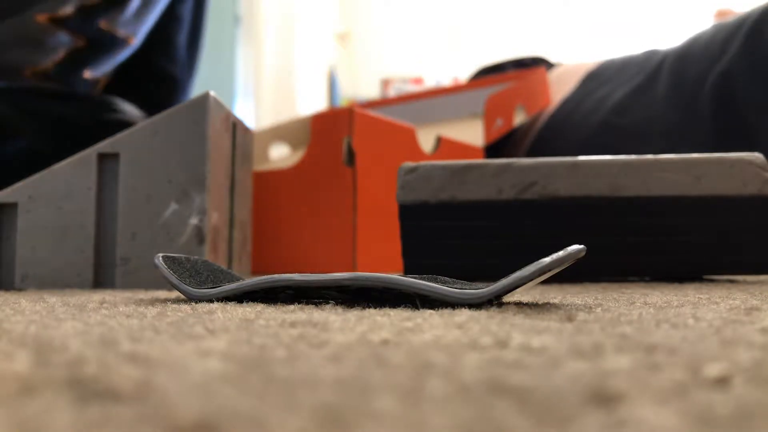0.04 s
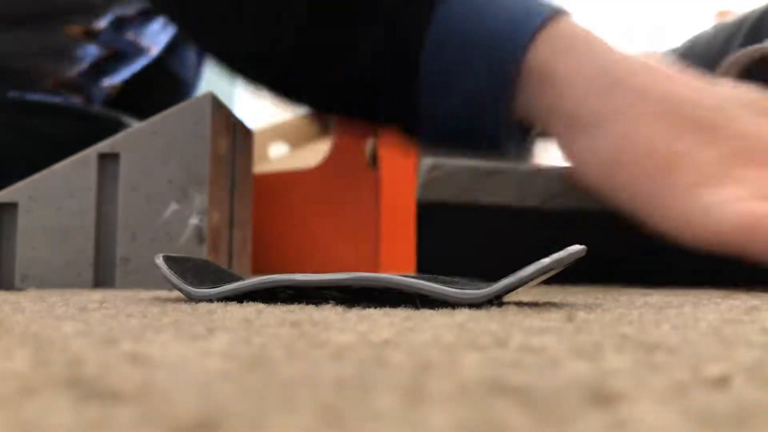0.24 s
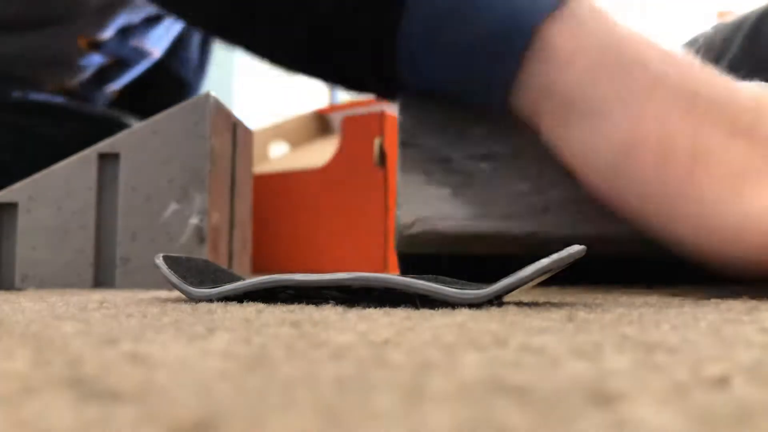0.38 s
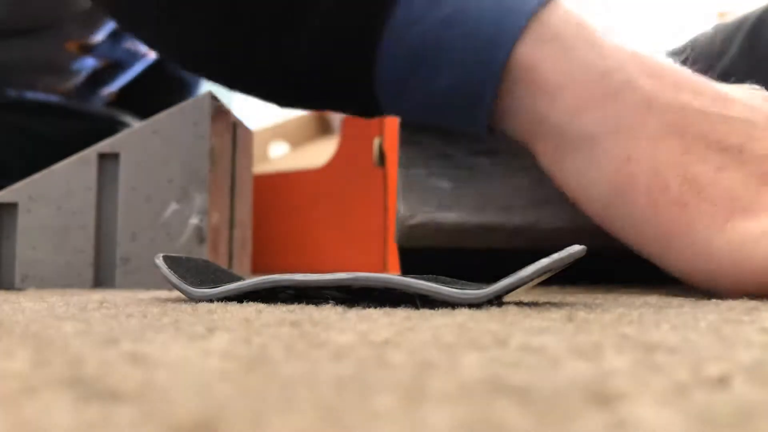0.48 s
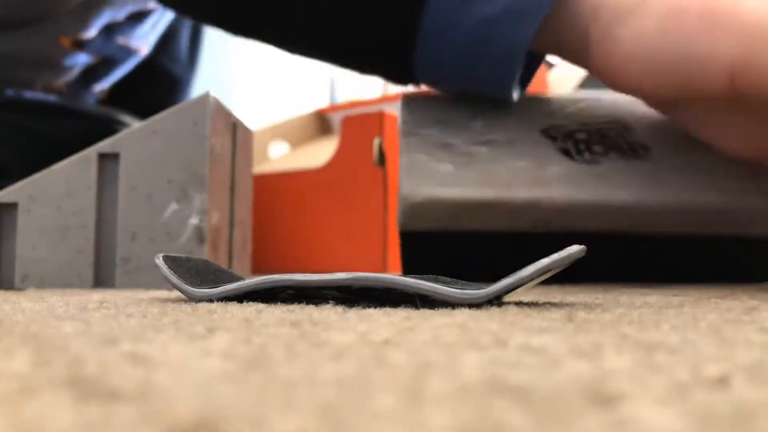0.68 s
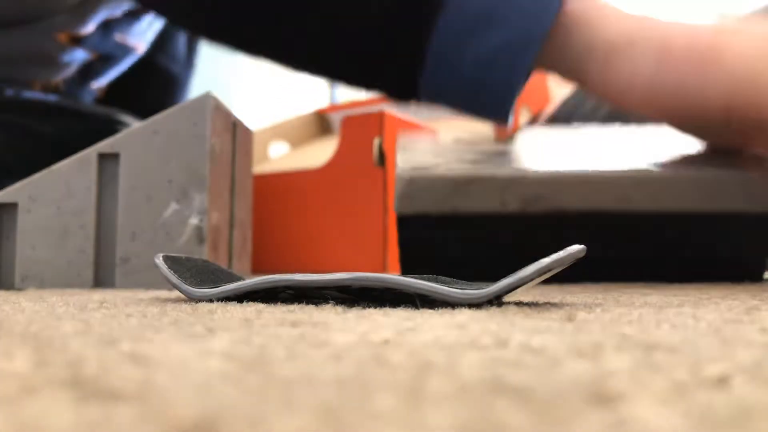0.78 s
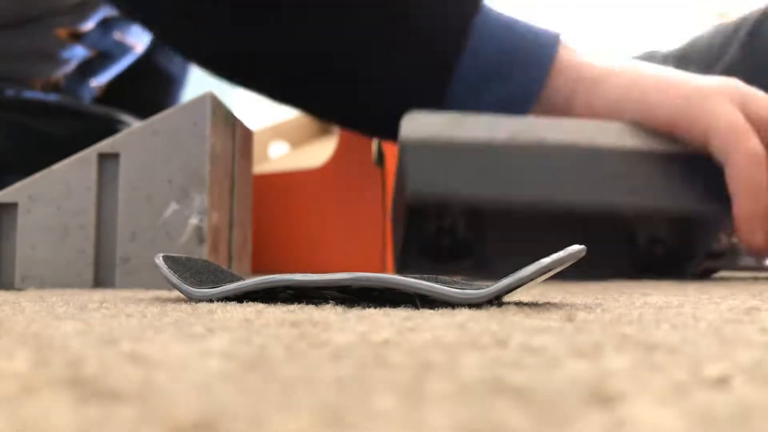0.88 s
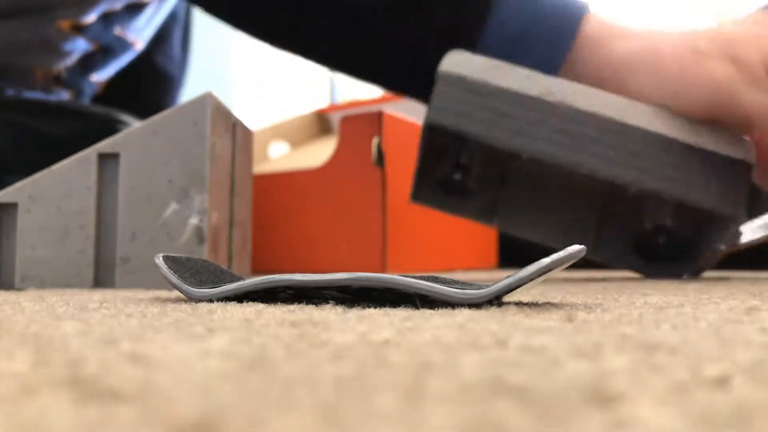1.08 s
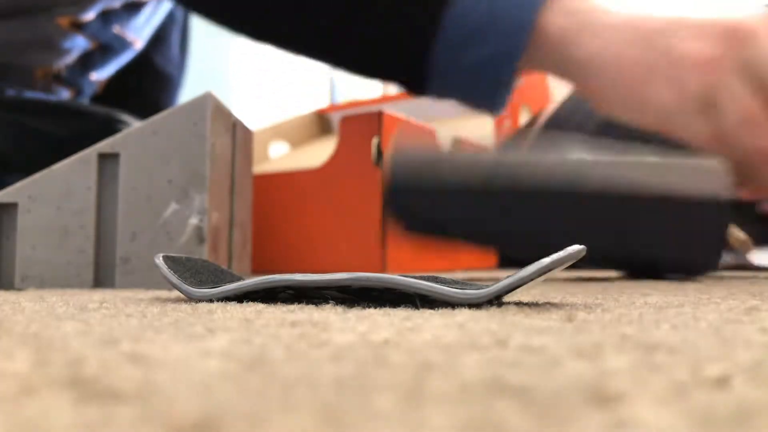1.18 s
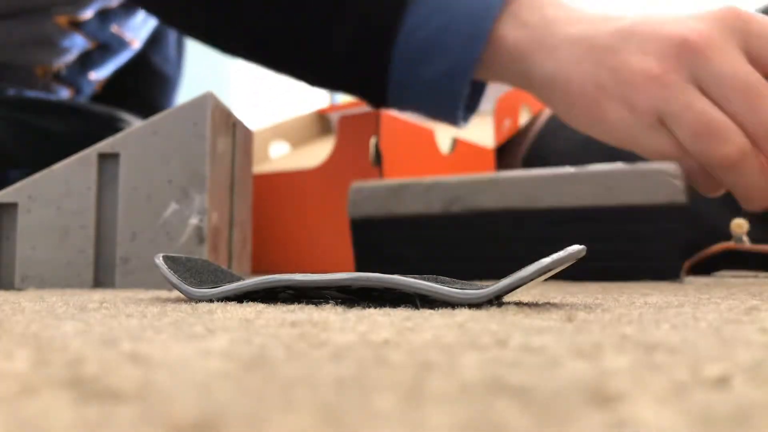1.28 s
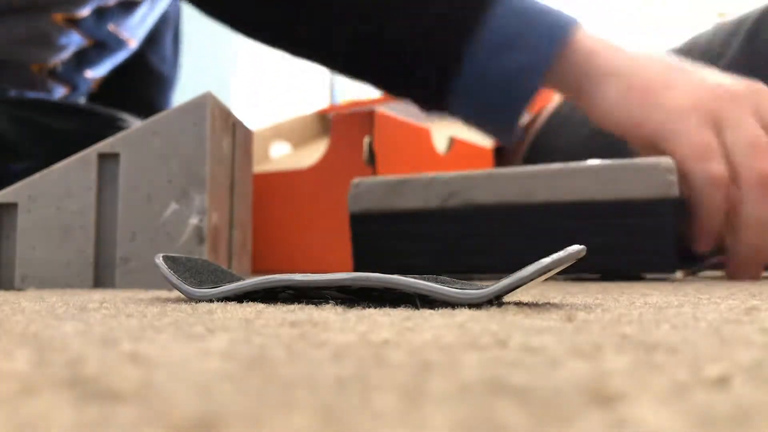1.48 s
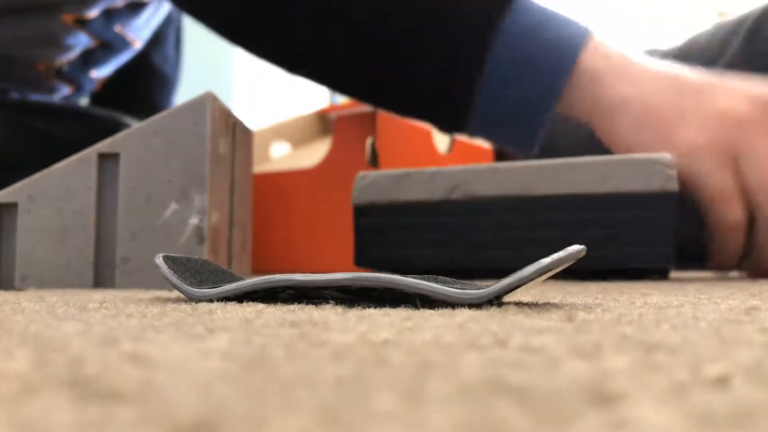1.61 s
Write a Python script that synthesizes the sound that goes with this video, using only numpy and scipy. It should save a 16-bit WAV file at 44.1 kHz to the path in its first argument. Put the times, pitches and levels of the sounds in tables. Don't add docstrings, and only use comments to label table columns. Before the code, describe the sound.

A toy skateboard clacks hard and rattles to rest, then a hollow plastic box slaps, scrapes and knocks in a hand on carpet, with dull floor thumps, close microphone in a small furnished room.

```python
import sys
import numpy as np
from scipy import signal
from scipy.fft import rfft, irfft, next_fast_len
from scipy.io import wavfile
from scipy.ndimage import uniform_filter1d, map_coordinates

SR = 44100
rng = np.random.default_rng(int(sys.argv[2]) if len(sys.argv) > 2 else 0)


def undo_db(level):
    steps = np.asarray(level, float) / 20
    return 10 ** steps


def log_audio(samples):
    frames = np.atleast_2d(samples).T
    limited = np.clip(frames, -1, 1)
    pcm = np.round(limited * 32767).astype(np.int16)
    wavfile.write(sys.argv[1], SR, pcm)


N = 72765


def unit(x):
    return x / np.sqrt(np.mean(x ** 2) + 1e-20)


def along(points, hz):
    f, v = np.transpose(points)
    return np.interp(np.log(hz + 1), np.log(f + 1), v)


def curve(rows):
    return np.interp(np.arange(N) / SR, *np.transpose(rows))


def wobble(rate):
    knots = rng.standard_normal(int(N * rate / SR) + 4)
    return map_coordinates(knots, [np.arange(N) * rate / SR])


def filtered(x, response):
    m = next_fast_len(len(x) + SR // 2)
    return irfft(rfft(x, m) * response(np.fft.rfftfreq(m, 1 / SR)), m)[:len(x)]


def body(peaks):
    def response(f):
        total = 0
        for k, (centre, width, db) in enumerate(peaks):
            mode = 1j * f * width / (centre * centre - f * f + 1j * f * width)
            total = total + (-1) ** k * undo_db(db) * mode
        return total
    return response


def add(track, s, x):
    i = round(s * SR)
    track[i:i + len(x)] += x[:len(track) - i]


def noise(tone):
    return unit(filtered(rng.standard_normal(N), lambda f: undo_db(along(tone, f))))


# (frequency [Hz], level [dB])
HISS_TONE = [(18, -15), (30, 15.5), (145, 6.5), (523, -7), (5990, -49), (6480, -87), (7390, -22.5),
             (15800, -19)]


def hiss():
    return undo_db(-65) * noise(HISS_TONE)


# (frequency [Hz], t60 [s])
ROOM_DECAY = [(200, 0.55), (1000, 0.18), (4000, 0.21), (12000, 0.24)]


def room(x):
    level_db, gap_s = -17, 0.0072
    out = np.zeros(N)
    for i in range(0, N, SR // 10):
        hz, t, z = signal.stft(rng.standard_normal(SR // 2), SR, nperseg=256)
        decay = undo_db(-60 * t / along(ROOM_DECAY, hz)[:, None])
        tail = signal.istft(z * decay, SR, nperseg=256)[1]
        tail = tail / np.linalg.norm(tail)
        add(out, i / SR + gap_s, signal.fftconvolve(x[i:i + SR // 10], tail))
    return undo_db(level_db) * out


# (time [s], level [dB])
SHUFFLE_LEVEL = [(0, -84), (.13, -74), (.2, -69), (.27, -64), (.36, -56), (.55, -60), (.68, -67),
                 (.85, -63), (1.08, -66), (1.3, -68), (1.65, -69)]
# (frequency [Hz], level [dB])
SHUFFLE_TONE = [(18, -43), (30, -84), (135, -20), (1260, -20.5), (1890, -18.5), (2530, -21), (6500, -24.5),
                (8450, -37), (14300, -120)]


def shuffle():
    return undo_db(curve(SHUFFLE_LEVEL) + 1.5 * wobble(23.15)) * noise(SHUFFLE_TONE)


# (time [s], peak level [dB], spread [s sqrt(Hz)], softness [Hz])
THUMPS = [(0.217, -49, 0.11, 131), (0.3077, -17, 0.05, 790), (0.3103, -25.5, 0.065, 600),
          (0.3094, -17, 0.35, 156), (0.3148, -16.5, 0.069, 420), (.3225, -26, 0.061, 600),
          (0.434, -41, 0.049, 199), (0.487, -26.5, 0.0436, 550), (0.573, -37, 0.074, 163),
          (0.735, -32.5, 0.033, 332), (0.798, -43.5, 0.025, 340), (0.943, -40, 0.054, 86),
          (0.964, -38.5, 0.028, 464), (1.178, -40.5, 0.075, 383), (1.329, -37.5, 0.028, 322),
          (1.346, -28, 0.059, 169.4), (1.416, -37, 0.073, 131), (1.467, -32.5, 0.036, 304)]
# (frequency [Hz], width [Hz], level over the thump [dB])
FLOORBOARD = [(141, 9, 6)]


def thumps():
    lead = 200
    low_hz, first_hz = 48, 427
    far_spread = 0.42
    out, blow = np.zeros(N), np.zeros(SR // 3)
    blow[lead] = 1
    for s, db, spread, soft_hz in THUMPS:
        def thump(f):
            g = np.minimum(f, first_hz)
            travel = np.exp(-4j * np.pi * spread * (np.sqrt(g) - g / 2 / np.sqrt(first_hz)))
            bass_cut = (1j * f / (low_hz + 1j * f)) ** 2
            soft = 1 + 0.9j * f / soft_hz - (f / soft_hz) ** 2
            hum = 1 + spread / far_spread * body(FLOORBOARD)(f)
            return travel * bass_cut / soft ** 2 * hum
        x = filtered(blow, thump)
        add(out, s - lead / SR, undo_db(db) * x / np.abs(x).max())
    return out


def slips():
    slips_per_s, grain_db = 500, 5
    u, e, a = rng.random(N), rng.exponential(size=N), rng.standard_normal(N)
    grains = (u < slips_per_s / SR) * undo_db(grain_db * np.minimum(e, 3)) * np.sign(a)
    return grains + 0.19 * a


# (time [s], level [dB])
DRAG_LEVEL = [
    (1.31, -74),
    (1.35, -44),
    (1.38, -51),
    (1.41, -50.5),
    (1.51, -51.5),
    (1.57, -63.5),
    (1.65, -58.5),
]
# (frequency [Hz], width [Hz], level [dB])
HOLLOW = [(210, 77, -7.5), (309, 26, 0.5), (355, 24, -5), (617, 77, -13.5)]


def drag():
    level = undo_db(curve(DRAG_LEVEL) + 3 * wobble(35.2))
    drum = filtered(slips(), lambda f: body(HOLLOW)(f) / (1 + (f / 1200) ** 2))
    return level * unit(drum)


# (time [s], level [dB])
SLIDE_LEVEL = [(0.7, -97), (0.76, -102), (0.82, -68.5), (0.86, -56), (0.895, -62), (0.92, -50),
               (0.955, -59.5), (1.02, -66.5), (1.08, -87), (1.14, -71), (1.18, -60), (1.21, -81),
               (1.31, -79), (1.37, -61.5), (1.6, -68)]
# (frequency [Hz], width [Hz], level [dB])
BOX = [(304, 92, -2.5), (420, 98, -2), (873, 96, 5.5), (999, 188, 2), (1484, 76, -0.5), (2210, 260, -5),
       (2665, 85, 1.5), (2858, 108, -4.5), (4020, 680, -6), (4840, 310, -5.5), (5830, 134, 0.5)]
# (frequency [Hz], level [dB])
CRACK = [(500, -17.5), (2000, -6.5), (6300, -16.5), (8000, -10), (12000, -12.5), (15500, -17.5)]


def slide():
    lumpy_db, bend_share, soft_hz = 3, 0.1, 2480
    low_level = undo_db(lumpy_db * wobble(40.4))
    low = low_level * unit(filtered(slips(), body(BOX[:5])))
    high_level = undo_db(lumpy_db * wobble(37.22) + 1)
    high = filtered(slips(), lambda f: body(BOX[4:])(f) / (1 + (f / soft_hz) ** 2))
    high = high_level * unit(high)
    bend = bend_share * wobble(30)
    drift = np.cumsum(bend - uniform_filter1d(bend, size=SR // 8))
    low = map_coordinates(low, [np.arange(N) + drift])
    dry_hiss = undo_db(-11.5 + lumpy_db * wobble(53.6)) * noise(CRACK)
    return undo_db(curve(SLIDE_LEVEL)) * (low + high + dry_hiss)


def contacts(hits, peaks, tone=CRACK):
    chatter_db, grit_db = 7, 4
    blow, sharp_s = 9, 0.031
    treble_hz, treble_share = 3300, 0.77
    edge_hz, crack_t60 = 7100, 0.008
    out, t = np.zeros(N), np.arange(SR // 10) / SR
    for s, db, crack_db, t60, hard_db in hits:
        a, b, e = rng.standard_normal((3, len(t)))
        chatter = a * undo_db(chatter_db * np.abs(e) - 60 * t / max(t60, 0.002))
        chatter *= 1 - np.exp(-t / t60 ** 2 - (sharp_s / t60) ** 4)
        chatter[:3] += blow * min(1, (sharp_s / t60) ** 2)
        tilted = []
        for (centre, width, gain), z in zip(peaks, 2 * b):
            gain = gain + hard_db * np.log2(centre / 1500) + z
            if centre > treble_hz:
                gain += treble_share * min(crack_db - 0.5, 0)
            tilted.append((centre, width, gain))
        ring = filtered(chatter, lambda f: body(tilted)(f) / (1 + 1j * f / edge_hz) ** 2)
        grit = b * undo_db(grit_db * np.abs(e[::-1]))
        crack = filtered(grit, lambda f: undo_db(along(tone, f)))
        crack = crack * undo_db(-60 * t / (crack_t60 + t60 / 2))
        both = ring / np.abs(ring).max() + undo_db(crack_db) * crack / np.abs(crack).max()
        add(out, s, undo_db(db) * both / (1 + undo_db(crack_db)))
    return out


# (frequency [Hz], width [Hz], level [dB])
NUT_HITS = [
    (.76, -52, -24, 0.029, -2),
    (.7765, -56, -22, .02, 3),
    (.791, -48, -20, 0.042, 0),
    (.837, -50, -20, 0.027, -3),
]
NUT = [(5340, 300, -6), (6030, 230, 0)]


def loose_nut():
    return contacts(NUT_HITS, NUT)


SNAP_HITS = [
    (.2935, -29, 6, 0.07, -5),
    (.3004, -37, 20, .02, 3),
    (.3152, -22, 32, 0.036, -10),
    (.6705, -47, 20, .01, 0),
    (.9068, -57, 20, 0.019, 0),
    (.933, -52, 20, .05, -2),
    (1.3299, -39, 25, .035, 0),
]
# (frequency [Hz], level [dB])
SNAP_TONE = [(2000, -3), (6300, -16), (9000, -6), (12500, -1.5), (15500, -9.5)]
AXLE = [(1960, 470, -7.5), (3670, 830, 2.5), (4530, 660, 4.5), (5150, 460, 13)]


def snaps():
    return contacts(SNAP_HITS, AXLE, SNAP_TONE)


AXLE_HITS = [
    (.2192, -15.5, -2, 0.024, -5),
    (.2304, -28, 7, 0.02, -41),
    (.5814, -35.5, 10, 0.035, -8),
    (.8564, -57, 12, 0.011, 0),
    (.9484, -42, 24, 0.019, 9),
    (1.0504, -34, 0.5, 0.02, 15),
]


def axles():
    return contacts(AXLE_HITS, AXLE)


RIM_HITS = [
    (1.2345, -23, 1, .008, 12),
    (1.237, -23.5, -4, 0.021, 0),
    (1.2395, -22.5, 7, 0.012, -12),
    (1.243, -33.5, -25, .03, 3),
]
RIM = [(850, 51, -5.5), (1540, 57, -7), (2123, 82, 4), (2490, 99, -2), (3820, 220, 0), (4670, 260, -2)]


def box_rim():
    return contacts(RIM_HITS, RIM)


LID_HITS = [
    (.734, -18, -11.5, 0.017, 2),
    (.7362, -16.5, -16.5, 0.0086, 0),
    (.7465, -20.5, 0, 0.027, 19),
    (.7485, -17.5, -2.5, .02, -2.5),
    (.7505, -28, -13.5, 0.027, -1.5),
]
LID = [(284, 107, -8), (892, 60, 0), (1482, 88, -4), (2230, 110, -16), (2530, 170, -14.5), (3720, 240, -11),
       (3953, 94, -3.5), (4600, 170, -6), (5360, 250, -10), (5600, 110, -22), (5900, 160, -9.5)]


def box_lid():
    return contacts(LID_HITS, LID)


BOX_HITS = [(.796, -40.5, -18, 0.035, 2), (.831, -64, -20, .02, -4), (.838, -43, -23, 0.065, -3.5),
            (.846, -50, -23, 0.019, -20), (.858, -41, -25, 0.012, -1.5), (.871, -36.5, -32, 0.024, -5),
            (.899, -63, -25, .015, 8), (.907, -33.5, 5, .02, 1.5), (.926, -44, -28, 0.042, 0),
            (.963, -28.5, -12.5, 0.035, 1), (.988, -31, -11, 0.042, 1.5), (1.001, -43, -17, 0.024, 8),
            (1.042, -28, 0, 0.045, 0), (1.104, -41, -41, 0.039, -3.5), (1.127, -41, -38, 0.044, -7),
            (1.136, -34.5, -38, 0.054, -4), (1.144, -54, -21, 0.024, -2), (1.161, -32.5, -22, 0.091, 0.5),
            (1.174, -23, -21, 0.049, 4.5), (1.178, -17.5, 19, 0.031, -12), (1.1805, -25, -9, 0.025, 7),
            (1.184, -23.5, -7.5, 0.022, 0), (1.1875, -28, -10, 0.044, 0), (1.191, -31, 6, 0.013, 12),
            (1.194, -23.5, -18, 0.027, 3.5), (1.204, -55, -20, 0.015, -1), (1.277, -32, -13, 0.053, 5),
            (1.285, -68, -30, 0.0093, 9), (1.349, -34.5, -7, 0.075, -14.5), (1.365, -42.5, -26, 0.055, -5),
            (1.468, -43, -40, 0.047, -4)]


def box():
    return contacts(BOX_HITS, BOX)


TAIL_HITS = [
    (.4319, -16, -7, 0.0045, 2),
    (.4326, -9.5, -4.5, 0.02, -1),
    (.4342, -17, -8.5, 0.031, 2),
    (.445, -35.5, -18, 0.011, -4),
]
TAIL = [(600, 310, -7.5), (1563, 350, -2), (2560, 100, -4), (3940, 120, -5), (4710, 240, 4),
        (8200, 1100, -2), (9400, 270, -9)]


def board_tail():
    return contacts(TAIL_HITS, TAIL)


BOARD_HITS = [(.459, -30.5, 13, .025, 8), (.4863, -12.5, 1, 0.021, -1), (.4872, -11, 2.5, 0.0087, 2.5),
              (.4905, -23.5, -5, .03, 4), (.499, -35, -25, 0.04, 7), (.532, -27.5, -33, 0.0015, -2.5),
              (.546, -22.5, -2, 0.031, -1.5), (.577, -40.5, -9, 0.025, 11), (.591, -41, 1, 0.019, 3),
              (.627, -42.5, 6, 0.047, 24), (.676, -47.5, -25, 0.01, 3.5)]
BOARD = [(550, 280, -2), (950, 78, 3.5), (1116, 32, 2.5), (1490, 500, -1.5), (1887, 59, 11), (2647, 75, 1),
         (4100, 350, 2), (4620, 400, 1.5), (6000, 1300, -6.5)]


def board():
    return contacts(BOARD_HITS, BOARD)


def scene():
    near = board() + axles() + snaps() + box() + box_lid()
    near += board_tail() + loose_nut() + box_rim()
    near += thumps() + slide() + drag()
    return (shuffle() + near + room(near) + hiss())[None]


# (frequency [Hz], width [Hz], share lost)
MIC_DIPS = [(3327, 167, 0.58), (6420, 280, 0.68)]


def microphone(x):
    low_hz, top_hz = 36, 16000

    def response(f):
        dips = 1
        for centre, width, share in MIC_DIPS:
            dips = dips * (1 - min(share, 1) * body([(centre, width, 0)])(f))
        return dips * (1j * f / (low_hz + 1j * f)) ** 4 / (1 + (f / top_hz) ** 60)
    return filtered(x, response)


def top_cut(x):
    return signal.sosfilt(signal.butter(12, 17000, fs=SR, output="sos"), x)


def record(dry):
    mix = microphone(dry[0])[None]
    return top_cut(mix)


dry = scene()
out = record(dry)
log_audio(out)
```